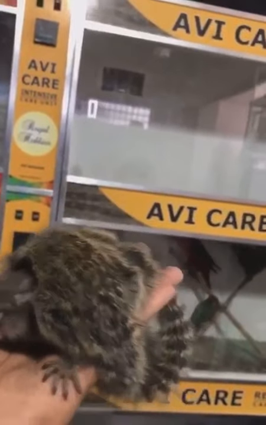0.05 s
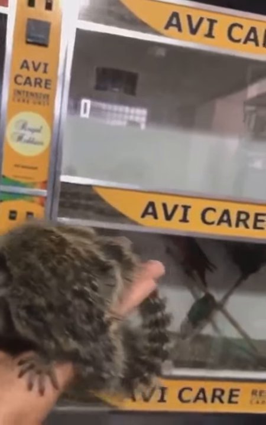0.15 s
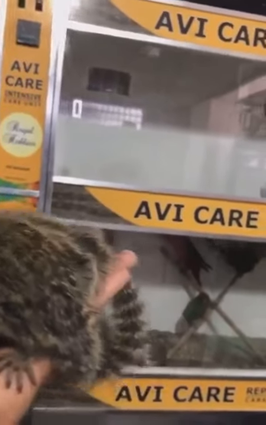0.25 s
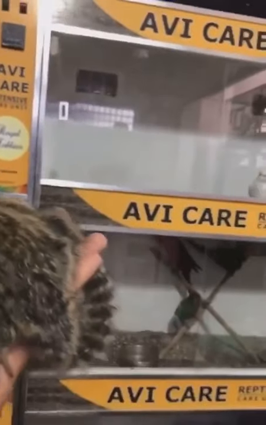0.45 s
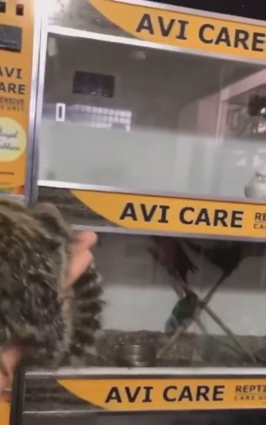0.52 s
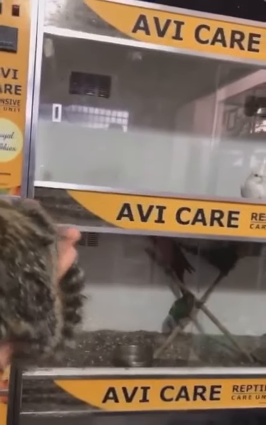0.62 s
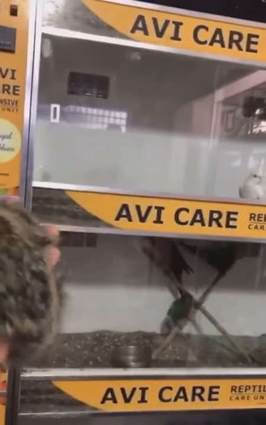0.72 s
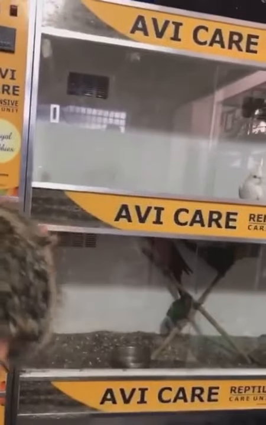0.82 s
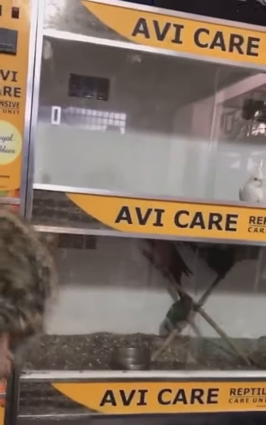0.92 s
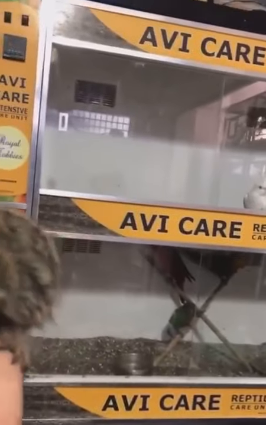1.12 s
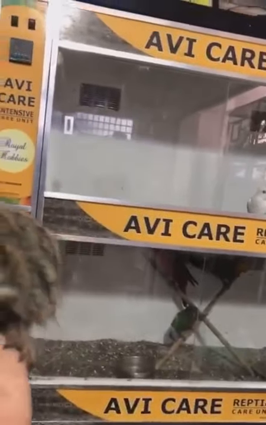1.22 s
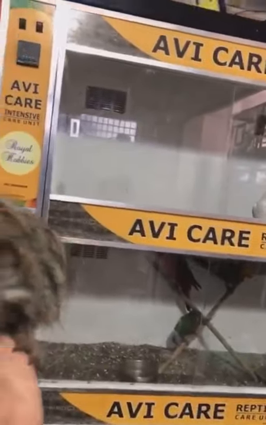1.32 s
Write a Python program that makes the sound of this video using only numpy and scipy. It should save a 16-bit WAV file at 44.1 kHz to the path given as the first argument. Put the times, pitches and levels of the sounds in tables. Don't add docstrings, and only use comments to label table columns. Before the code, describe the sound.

Two short, piercing parrot squawks come close together, the second rougher with a sagging tail; faint chirps, beak taps on wire and weaker calls surround them in a reflective shop room with fan hum, picked up by a handheld microphone.

```python
import sys
import numpy as np
from scipy import signal
from scipy.io import wavfile
from scipy.ndimage import uniform_filter1d, minimum_filter1d

SR = 44100
rng = np.random.default_rng(int(sys.argv[2]) if len(sys.argv) > 2 else 0)


def invert_db(x):
    u = np.asarray(x, float) / 20
    return 10 ** u


def transcribe(signal):
    frames = np.atleast_2d(signal).T
    limited = np.clip(frames, -1, 1)
    pcm = np.round(limited * 32767).astype(np.int16)
    wavfile.write(sys.argv[1], SR, pcm)


N = 59535

# t/s, f/Hz, level/dB, roughness [0-1]
SQUAWK_1 = [
    (.34, 2067, -24, 0.88),
    (.362, 2075, -15, 0.51),
    (.395, 2063, -8, 0.23),
    (.415, 2064, -10.5, 0.37),
    (.437, 2058, -11, 0.2),
    (.4545, 2012, -10, 0.77),
    (.4575, 1887, -16.5, 0.88),
]
SQUAWK_2 = [
    (.62, 1598, -28, 0.94),
    (.665, 1901, -16.5, 0.69),
    (.70, 2032, -8.5, 0.54),
    (.713, 2094, -8, 0.22),
    (.72, 2025, -15, .6),
    (.765, 1984, -12.5, 1),
    (.785, 1854, -19, 0.66),
]
SQUAWK_2_TAIL = [
    (.77, 1860, -18, 0.42),
    (.782, 1884, -27, 0.75),
    (.80, 1872, -17.5, 0.18),
    (.817, 1820, -14.5, 0.47),
    (.835, 1796, -18, 0.91),
    (.85, 1800, -29.5, .35),
    (.875, 1850, -83, 0.78),
]
# t/s, f/Hz, level re first side/dB
SECOND_SIDE = [
    (.35, 4300, -3),
    (.39, 4340, 1),
    (.41, 4340, 2),
    (.417, 4300, -6),
    (.425, 4260, 1),
    (.44, 4190, -5),
    (.455, 4120, -5),
]
SQUAWK_1_TONES_DB = [-12, -20, -4, -22]
SQUAWK_2_TONES_DB = [-10.5, -3.5, -3.5, -3.5]
TAIL_TONES_DB = [-2, -6, 0, -4]
LOW_TONES_DB = [-29, 2.5, 0, 7, -18, -22]
HIGH_TONES_DB = [-21, -15, -17.5, -31]
PEEP_TONES_DB = [-10, 0, -24]
# f/Hz, width/Hz, level/dB
THROAT_PEAKS = [(3010, 300, -6.5), (4400, 1200, -3), (5650, 3900, -4.5), (7840, 2070, -4)]
# t/s, length/s, level/dB, f/Hz, roughness [0-1]
FAR_LOW_CALLS = [
    (.322, 0.0225, -31, 1463, 0.55),
    (.955, 0.038, -34.5, 1298, .7),
    (1.022, 0.064, -25, 1233, 0.62),
]
FAR_HIGH_CALLS = [
    (.155, 0.064, -27, 1800, 0.82),
    (.57, 0.03, -32, 1901, 0.52),
    (1.137, 0.0373, -30.5, 1867, 0.462),
]
FAR_PEEP = [
    (.054, .016, -35, 1315, .1),
]
# t/s, length/s, level/dB, opening note f/Hz, note level re rasp/dB
CHIRP_RUN = [(-.03, 0.029, -32.5, 5050, -20), (0.13, 0.023, -24.5, 5220, -1),
             (0.199, 0.053, -27, 5600, 5.5), (.267, 0.022, -28.5, 4850, 3.5), (0.306, 0.036, -35, 6070, -8),
             (0.487, 0.039, -29.5, 5100, -8), (0.557, 0.03, -31, 6900, 5), (0.608, .03, -36, 5870, -34),
             (0.948, .02, -46, 4500, 2), (1.006, 0.018, -42, 4500, 5.5), (1.029, .015, -41, 4270, 13),
             (1.129, 0.018, -47, 6060, 9.5)]
# f/Hz, width/Hz, level/dB
BEAK_PEAKS = [(5100, 890, 1.5), (6554, 810, 9), (7120, 2100, 2)]
# t/s, peak level/dB
WIRE_TICKS = [
    (.124, -22),
    (.4035, -3),
    (.4245, -2),
]
# f/Hz, level/(dB per Hz)
HUM_SPECTRUM = [(15, -38), (25, -6), (112, 3.5), (786, -11.5), (3620, -19.5), (4630, -18), (5240, -37),
                (7760, -22), (9000, -55), (11700, -103), (19800, -120)]
# t/s, level/dB
BEARING_DRONE = [
    (0.0, -64),
    (0.462, -72),
    (0.976, -43.5),
    (1.064, -34.5),
    (1.3, -37.5),
    (1.35, -76),
]
# t/s, level/dB
FLOCK_LEVEL = [
    (0, -100),
    (.08, -50),
    (.15, -40.5),
    (.55, -37),
    (.95, -46.5),
    (1.25, -42),
    (1.35, -65),
]


def in_time(rows):
    t_s, *columns = np.transpose(rows)
    return [np.interp(np.arange(N) / SR, t_s, column) for column in columns]


def rms_one(x):
    return x / np.sqrt(np.mean(x ** 2) + 1e-20)


def drift(rate_hz):
    settle = 9000
    r = np.exp(-2 * np.pi * rate_hz / SR)
    noise = rng.standard_normal(N + settle)
    return rms_one(signal.lfilter([1], [1, -2 * r, r * r], noise)[settle:])


def resonate(x, peaks):
    out = 0
    for k, (hz, width_hz, db) in enumerate(peaks):
        r = np.exp(-np.pi * width_hz / SR)
        poles = [1, -2 * r * np.cos(2 * np.pi * hz / SR), r * r]
        ring = signal.lfilter([1, 0, -1], poles, x + 1e-18) * (1 - r * r) / 2
        out = out + (-1) ** k * invert_db(db) * ring
    return out


def shape(start_s, length_s, attack_s, release_s):
    t = np.arange(N) / SR - start_s
    return np.clip(t / attack_s, 0, 1) * np.exp(-np.clip(t - length_s, 0, 1) / release_s)


def squawk(rows, tones_db, breath_share, second_db=None):
    hz, db, rough = in_time(rows)
    first_s, last_s = rows[0][0], rows[-1][0]
    effort = invert_db(db) * shape(first_s - .01, last_s - first_s + 0.016, 0.008, .005)
    return effort * voice(hz, rough, tones_db, breath_share, second_db)


def voice(hz, rough, tones_db, breath_share, second_db=None):
    rough = np.clip(rough, 0, 1)
    tremble = rough * (.04 * drift(353.6) + .03 * drift(50.2))
    phase = 2 * np.pi * np.cumsum(hz * (1 + tremble)) / SR
    tone = 0
    for k, db in enumerate(tones_db):
        waver = 1 + 1.17 * rough * drift(350)
        tone = tone + invert_db(db) * waver * np.sin((k + 1) * phase + k)
    if second_db is not None:
        tone = tone + second_side(second_db)
    flicker = invert_db(1.5 * drift(180))
    breath = resonate(rng.standard_normal(N) * (1 + np.cos(phase)) * flicker, THROAT_PEAKS)
    return np.sqrt(1 - rough) * rms_one(tone) + breath_share * rough * rms_one(breath)


def second_side(level_db):
    flutter_hz, flutter_depth = 150, .5
    hz, db = in_time(SECOND_SIDE)
    phase = 2 * np.pi * np.cumsum(hz * (1 + .012 * drift(480))) / SR
    flutter = 2 * np.pi * flutter_hz * np.arange(N) / SR
    return invert_db(level_db + db) * sum(flutter_depth ** k * np.sin(phase - k * flutter) for k in range(3))


def far_calls(rows, tones_db):
    attack_s, release_s, sag, breath_share = 0.0027, 0.01, 0.026, .4
    t = np.arange(N) / SR
    out = 0
    for start_s, length_s, db, hz, rough in rows:
        sagging_hz = hz * (1 - sag * np.clip((t - start_s) / length_s - .5, -1, 1))
        call = voice(sagging_hz, rough, tones_db, breath_share)
        out = out + invert_db(db) * shape(start_s, length_s, attack_s, release_s) * call
    return out


def chirps():
    clicks_per_s, fall_hz_per_s = 1500, 13000
    clicks = (rng.random(N) < clicks_per_s / SR) * rng.standard_normal(N)
    clicks = clicks + 0.11 * rng.standard_normal(N)
    rasp = rms_one(resonate(resonate(clicks, BEAK_PEAKS), BEAK_PEAKS))
    t = np.arange(N) / SR
    out = 0
    for start_s, length_s, db, hz, note_db in CHIRP_RUN:
        note_hz = hz - fall_hz_per_s * (t - start_s) + 150 * drift(360)
        phase = 2 * np.pi * np.cumsum(note_hz) / SR
        note = (np.sin(phase) + .25 * np.sin(phase / 2)) * shape(start_s, .01, .002, .007)
        out = out + invert_db(db) * (shape(start_s, length_s, 0.009, 0.019) * rasp + invert_db(note_db) * note)
    return out


def ticks():
    taps = np.zeros(N)
    for t_s, db in WIRE_TICKS:
        taps[int(t_s * SR)] = invert_db(db)
    return resonate(taps, [(1500, 1300, 12), (4500, 1200, 2)])


def room(x):
    t60_s, wall_cut_hz, gap_s = 0.18, 9700, .004
    t = np.arange(SR // 2) / SR
    dull = signal.lfilter([1], [1, -np.exp(-2 * np.pi * wall_cut_hz / SR)], rng.standard_normal(len(t)))
    tail = dull * invert_db(-60 * t / t60_s) * (t > gap_s)
    return signal.fftconvolve(x, tail / np.sqrt(np.sum(tail ** 2)))[:N]


def background():
    white = rng.standard_normal((2, N + SR))
    edges_hz = 22 * 2 ** np.arange(0, 9.6, .5)
    spectrum_hz, spectrum_db = np.transpose(HUM_SPECTRUM)
    hum = 0
    for k, (low, high) in enumerate(zip(edges_hz, edges_hz[1:])):
        sos = signal.butter(2, [low, high], "band", fs=SR, output="sos")
        band = signal.sosfilt(sos, white[k % 2])[SR:]
        db = np.interp(np.log(low * high) / 2, np.log(spectrum_hz), spectrum_db)
        hum = hum + invert_db(db + 1.37 * drift(12.2)) * band
    flock_peak = [(3400, 600, 0)]
    flock = rms_one(resonate(resonate(white[0, :N], flock_peak), flock_peak))
    chorus = flock * invert_db(in_time(FLOCK_LEVEL)[0] + 2.0 * drift(7))
    drone_phase = 2 * np.pi * np.cumsum(65 + 9.3 * drift(17)) / SR
    drone = invert_db(in_time(BEARING_DRONE)[0]) * np.sqrt(2) * np.sin(drone_phase)
    return invert_db(-35) * rms_one(hum) + chorus + drone


def scene():
    near = squawk(SQUAWK_1, SQUAWK_1_TONES_DB, .55, second_db=0)
    near = near + squawk(SQUAWK_2, SQUAWK_2_TONES_DB, .55) + squawk(SQUAWK_2_TAIL, TAIL_TONES_DB, .2)
    far = far_calls(FAR_LOW_CALLS, LOW_TONES_DB) + far_calls(FAR_HIGH_CALLS, HIGH_TONES_DB)
    far = far + far_calls(FAR_PEEP, PEEP_TONES_DB)
    birds = near + far + chirps() + ticks()
    room_db = -12
    return (birds + invert_db(room_db) * room(birds) + background())[None]


def band_limit(x):
    return signal.sosfilt(signal.butter(12, 12270, fs=SR, output="sos"), x)


def record(dry):
    limit, edge_hz, grains_per_s = .8, 8600, 17
    fizz_db, duck_db, duck_slope = -65.5, -22, 6
    top_cut = signal.ellip(12, .5, 70, edge_hz, fs=SR, output="sos")
    low = signal.sosfilt(top_cut, limit * np.tanh(dry / limit))
    level_db = 10 * np.log10(uniform_filter1d(low ** 2, size=2048) + 1e-9)
    held_db = -minimum_filter1d(-level_db, size=2400, origin=600)
    bursts = uniform_filter1d(1. * (rng.random(N) < grains_per_s / SR), size=30) * 30
    grain = rng.standard_normal(N) * (1 + 9.0 * bursts)
    fizz_band = signal.butter(7, [9300, 11400], "band", fs=SR, output="sos")
    fizz = rms_one(signal.sosfilt(fizz_band, grain))
    ducking = 1 + invert_db(duck_slope * (held_db - duck_db))
    gain = invert_db(fizz_db + (level_db + 33) + 2.6 * drift(29)) / ducking
    return band_limit(low + gain * fizz)


dry = scene()
out = record(dry)
transcribe(out)
```